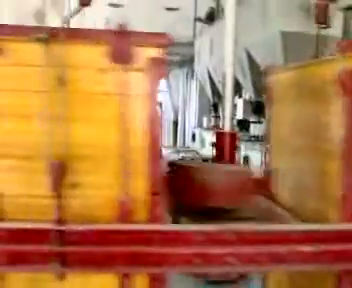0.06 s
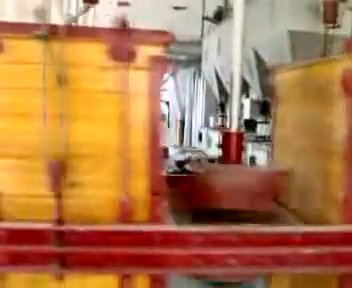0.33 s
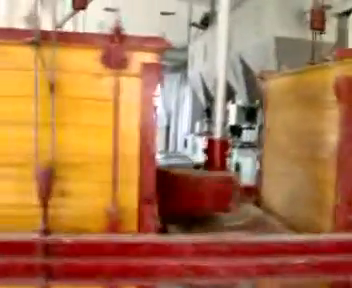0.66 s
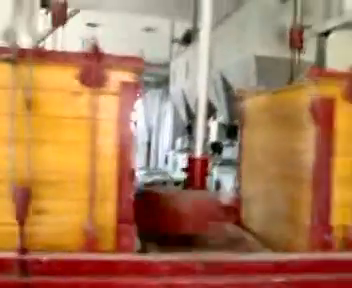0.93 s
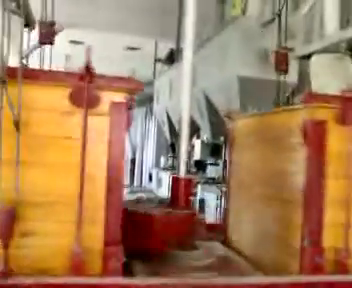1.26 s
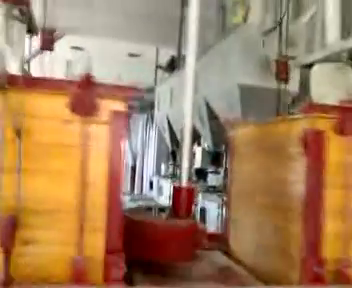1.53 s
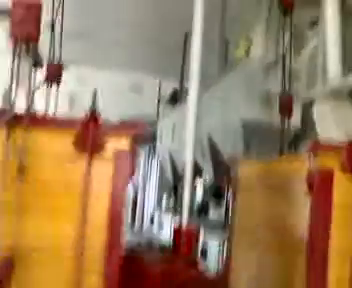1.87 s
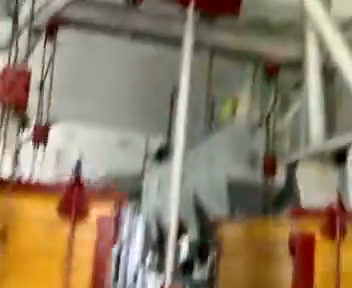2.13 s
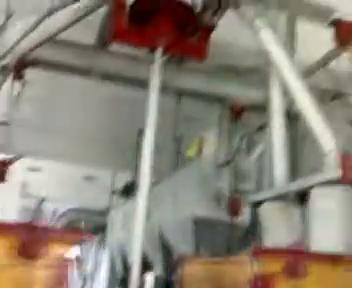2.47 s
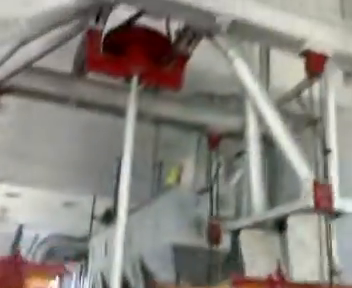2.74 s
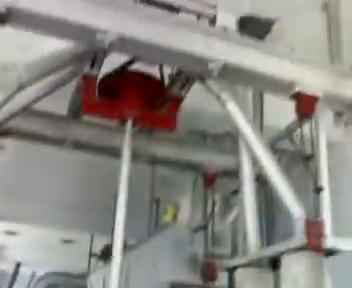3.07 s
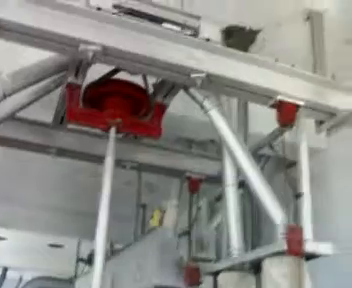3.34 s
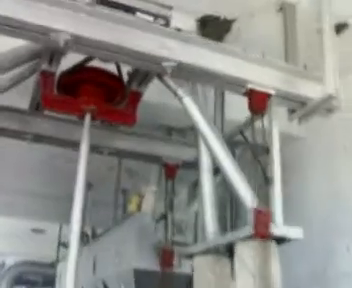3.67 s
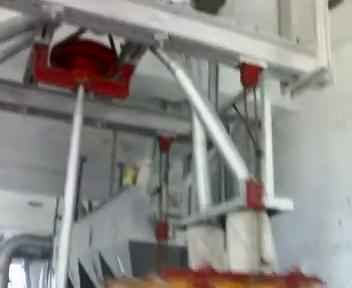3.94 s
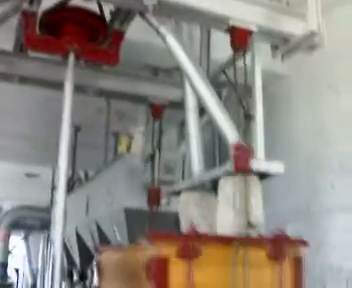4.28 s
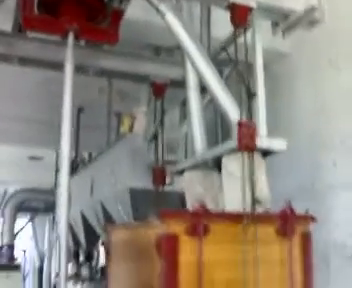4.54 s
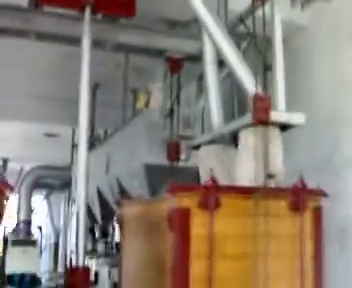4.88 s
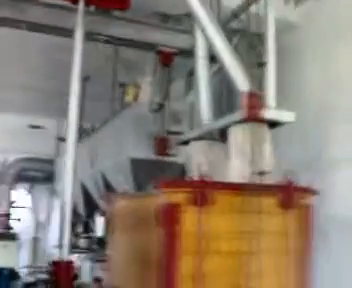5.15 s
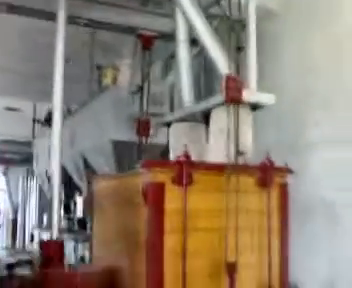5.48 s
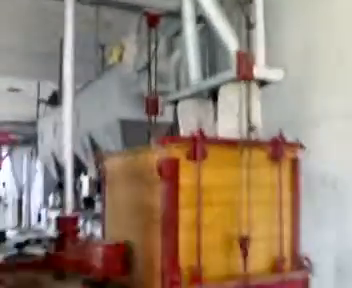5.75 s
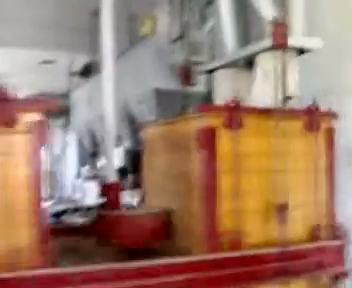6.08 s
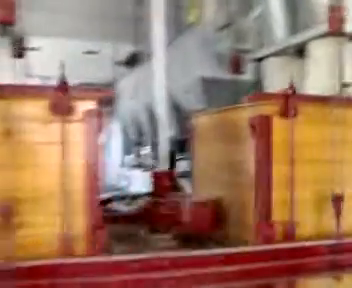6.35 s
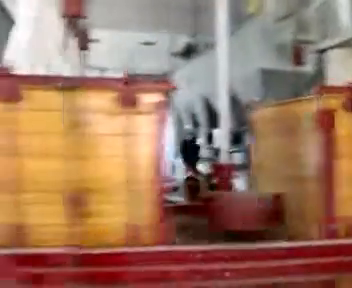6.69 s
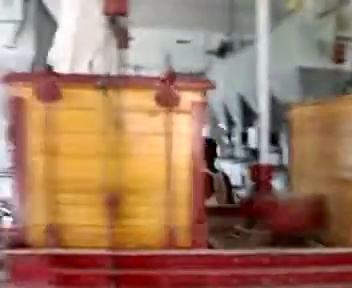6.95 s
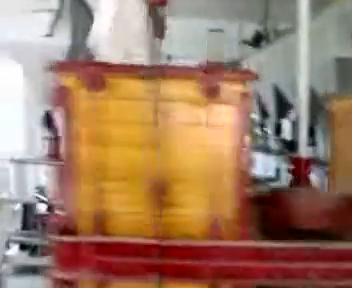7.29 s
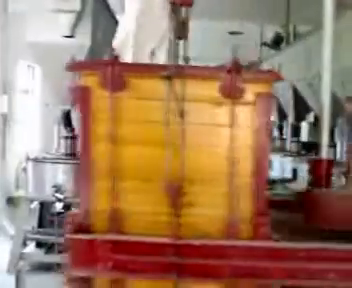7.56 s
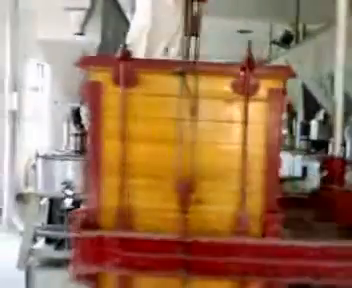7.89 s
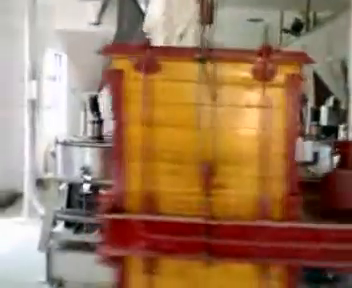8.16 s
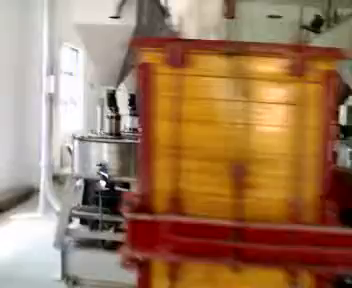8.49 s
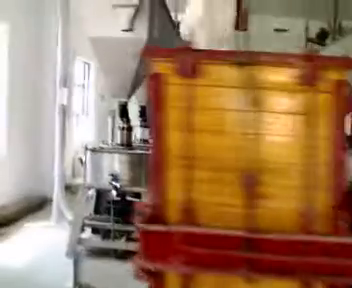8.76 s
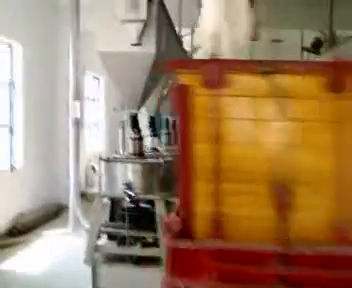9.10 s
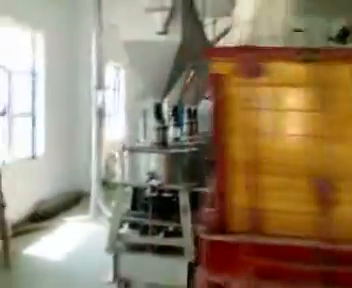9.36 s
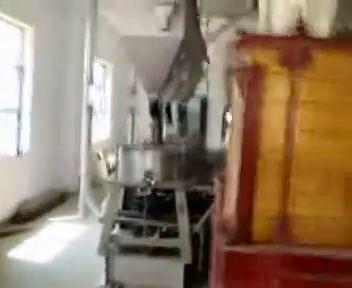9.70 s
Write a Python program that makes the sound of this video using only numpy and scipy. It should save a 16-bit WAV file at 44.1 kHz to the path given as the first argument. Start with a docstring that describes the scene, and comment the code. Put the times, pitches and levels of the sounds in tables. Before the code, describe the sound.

In a flour mill hall, motors and a fan drone under the pulsing hum of geared rollers and the dull swish of a sifter. Ducts rush and hiss, and steel spouts ring with flowing grain. The room blends everything into one loud, constant roar. As the microphone drifts nearer the overhead pipes, a faint metallic whine rises and then recedes.

```python
"""Geared roller mills hum, throb and beat in a flour mill hall, heard from beside the sifter.
Motors and a fan drone, meal swishes round the sieves, and stock rushes through ringing steel spouts.
The hall blends it all into a steady roar. The microphone moves slowly through its standing waves,
nearer to the overhead spouts and a thin metallic whine, and away again."""
import sys
import numpy as np
from scipy import signal
from scipy.fft import rfft, irfft, next_fast_len
from scipy.io import wavfile
from scipy.ndimage import uniform_filter1d, map_coordinates

SR = 44100
rng = np.random.default_rng(int(sys.argv[2]) if len(sys.argv) > 2 else 0)


def materialize(psi):
    """Save the field psi as 16-bit PCM at rate SR to the path in sys.argv[1].

    A 1-D psi becomes a single channel; in a 2-D psi each row is a channel.
    """
    bounded = np.clip(np.atleast_2d(psi).T, -1, 1)
    quanta = np.round(bounded * 32767).astype(np.int16)
    wavfile.write(sys.argv[1], SR, quanta)


N = 433934
t = np.arange(N) / SR


def amp(db):
    """Decibels to gain."""
    return 10 ** (np.asarray(db) / 20)


def unit(x):
    """Scale to rms 1."""
    return x / np.sqrt(np.mean(np.abs(x) ** 2) + 1e-20)


def curve(rows):
    """Interpolate (seconds, value) rows to one value per sample."""
    return np.interp(t, *np.transpose(rows))


def wobble(rate_hz):
    """Smooth random curve, rate_hz knots a second."""
    coarse = t[::64]
    knots = rng.standard_normal(int(t[-1] * rate_hz) + 4)
    return np.interp(t, coarse, map_coordinates(knots, [coarse * rate_hz + 1]))


def filtered(x, response):
    """Apply a gain given as a function of Hz."""
    size = next_fast_len(N + 8192)
    return irfft(rfft(x, size) * response(np.fft.rfftfreq(size, 1 / SR)), size)[:N]


def coloured(x, spectrum):
    """Shape x by (Hz, dB) rows, at rms 1."""
    points_hz, db = np.transpose(spectrum)
    return unit(filtered(x, lambda hz: amp(np.interp(np.log(hz + 1), np.log(points_hz), db))))


def hall_noise(patchy_db):
    """Noise whose narrow peaks and dips shift as the microphone crosses standing waves."""
    bins = signal.stft(rng.standard_normal(N), nperseg=4096)[2]
    field = uniform_filter1d(rng.standard_normal(bins.shape), size=2, axis=0)
    field = unit(uniform_filter1d(field, size=14, axis=1))
    return unit(signal.istft(bins * amp(patchy_db * field), nperseg=4096)[1][:N])


def tone(cycles, diffuse, drift_hz):
    """Direct tone plus reflections that drift in strength and phase, at rms 1."""
    phase = 2 * np.pi * (cycles + rng.random())
    in_phase = (1 + diffuse * wobble(drift_hz)) * np.sin(phase)
    quadrature = diffuse * wobble(drift_hz) * np.cos(phase)
    return unit(in_phase + quadrature)


# Rumble spectrum. Each row: frequency in Hz, relative density in dB.
RUMBLE_SPECTRUM = [(20, -20.5), (50, -19), (78, -14.5), (112, -5.5), (150, -0.9), (250, 0.5), (370, 1),
                   (490, -2.5), (620, -2), (800, -9), (1500, -60.5)]
# Rumble envelope. Each row: time in seconds, level in dB.
RUMBLE_DB = [(0, -22.5), (1.35, -22.5), (1.85, -22), (2.7, -23), (3.2, -22.5), (5.5, -22.5), (7.2, -23.5),
             (8.1, -23.5), (8.5, -23.5), (9.84, -23.5)]


def hall_rumble():
    """The hall blends the machines into a low, nearly steady roar."""
    return amp(curve(RUMBLE_DB)) * coloured(hall_noise(patchy_db=1.0), RUMBLE_SPECTRUM)


# Duct rush and air hiss spectra. Each row: frequency in Hz, relative density in dB.
DUCT_SPECTRUM = [(600, -36), (860, -8), (985, 1.5), (1190, -0.5), (1380, -3.5), (1900, -7.5), (3000, -24.5),
                 (5000, -52.5)]
AIR_SPECTRUM = [(800, -3.5), (2900, 5), (3600, 0.5), (4150, 1), (4900, 2), (5900, -0.5), (7000, -5.5),
                (7380, -10.5), (7600, -38.5)]
# Nearness to the overhead spouts. Each row: time in seconds, gain in dB.
NEARNESS_DB = [(0, -0.8), (0.28, -0.5), (0.45, -2), (1.2, -1), (1.9, 0), (2.3, 1.6), (2.6, -1.5),
               (3.0, 1.5), (3.4, 4), (3.85, 1.5), (4.2, 2.5), (4.45, 0.5), (4.9, 1.5), (5.3, 1), (6.0, 1.2),
               (6.6, 0.5), (7.1, -0.5), (7.5, -1.5), (8.0, -2.5), (8.7, -3.5), (9.1, -2), (9.35, -0.3),
               (9.84, -4)]
# Rushing layers by name. Each row: base level in dB, share of nearness followed, surge depth in dB.
FLOW_LAYERS = {"ducts": (-22, .8, 0.23), "air": (-32, .35, .1)}


def conveying_flow():
    """Ducts rush and conveying air hisses, louder near the spouts and surging with the feed."""
    rush = np.zeros(N)
    for name, spectrum in (("ducts", DUCT_SPECTRUM), ("air", AIR_SPECTRUM)):
        base_db, share, surge_db = FLOW_LAYERS[name]
        level_db = base_db + share * curve(NEARNESS_DB) + surge_db * wobble(rate_hz=3.0)
        rush += amp(level_db) * coloured(hall_noise(patchy_db=1.0), spectrum)
    return rush


# Whine partials. Each row: frequency in Hz, relative level in dB.
WHINE_PARTIALS = [(1752, -2), (1765, -1.5), (1811, -6.5), (2712, -12.5)]
# Whine envelope. Each row: time in seconds, gain in dB.
WHINE_GAIN_DB = [(0, -40.5), (1.9, -43.5), (2.15, -27), (2.7, -28), (3.2, -29), (4.1, -25.5), (4.5, -38),
                 (6.3, -39), (6.9, -34.5), (7.4, -42), (9.84, -43.5)]


def whine():
    """A metallic whine, probably the overhead drive, stands out when the microphone points at it."""
    partials = sum(amp(db) * tone(hz * t, diffuse=0.76, drift_hz=7) for hz, db in WHINE_PARTIALS)
    return amp(curve(WHINE_GAIN_DB)) * partials


# Motor and fan tones. Each row: frequency in Hz, level in dB.
MOTOR_TONES = [(46.05, -51), (91.2, -45), (182.4, -38.5), (185, -41.5), (192.7, -39.5), (199.7, -48.5),
               (212.6, -45.5), (273.7, -44), (333.2, -43.5), (691, -44), (733, -47.5), (812, -44),
               (881, -43), (988, -38), (1073, -41)]
# Main fan tone in the standing waves. Each row: time in seconds, level in dB.
FAN_DB = [(0, -32), (2.5, -29), (3.2, -32.5), (4.1, -31.5), (4.5, -34.5), (5.15, -36.5), (5.45, -30.5),
          (6.3, -29.5), (8.2, -29), (8.6, -33), (9.84, -31.5)]


def motors_and_fan(fan_hz=197.4):
    """Motors and the suction fan hold speed and beat together; higher motor tones waver faster."""
    fan = amp(curve(FAN_DB)) * tone(fan_hz * t, diffuse=0.36, drift_hz=13)
    return fan + sum(amp(db) * tone(hz * t, diffuse=0.22 * hz / 200, drift_hz=0.8 + hz / 180)
                     for hz, db in MOTOR_TONES)


# Spout modes: the lower and the upper modes of the wide spouts, then the narrow spouts. Each row: frequency in
# Hz, width in Hz, relative level in dB.
WIDE_LOW_MODES = [(1590, 52, 1), (1632, 40, -6), (1645, 46, 0), (1700, 36, -3)]
WIDE_HIGH_MODES = [(1743, 50, -1), (1804, 41, -5), (1802, 42, -3.5), (1895, 80, -11), (1972, 82, -6),
                   (2180, 460, -12)]
NARROW_MODES = [(2480, 36, -5.5), (2560, 30, -3), (2580, 26, 0.5), (2634, 40, -2.5), (2682, 30, 3),
                (2750, 16, -0.5), (2760, 24, -3.5), (2730, 420, -8.5), (3590, 500, -9.5)]
# Ringing envelopes for the wide spouts' lower and upper modes and for the narrow spouts. Each row: time in
# seconds, level in dB.
WIDE_LOW_DB = [(0, -24), (.22, -21), (.4, -25), (1.25, -25), (1.6, -24), (2.25, -24), (2.55, -24.5),
               (3.2, -22.5), (3.8, -20.5), (4.25, -21), (4.48, -25.5), (4.7, -24), (4.94, -26.5), (5.08, -21),
               (5.35, -22), (5.6, -25.5), (5.8, -21.5), (6.1, -22.5), (6.5, -19.5), (6.62, -23.5), (6.85, -22),
               (7.35, -31), (7.78, -23), (7.92, -26), (8.6, -28), (9.2, -28), (9.38, -23), (9.84, -25)]
WIDE_HIGH_DB = [(0, -26), (.8, -24), (1.25, -27.5), (1.7, -23), (2.3, -25), (2.7, -24.5), (3.2, -20.5),
                (4.0, -21.5), (4.5, -23), (4.95, -24), (5.1, -22.5), (5.5, -24.5), (5.75, -22.5), (6.1, -24.5),
                (6.9, -23.5), (7.4, -26), (7.75, -25.5), (8.4, -26.5), (9.1, -27), (9.45, -23), (9.84, -27.5)]
NARROW_DB = [(0, -31), (.65, -31), (1.25, -33.5), (1.65, -29.5), (2.9, -29.5), (3.25, -25), (3.5, -27.5),
             (3.65, -27), (4.7, -30), (5.1, -28.5), (6.1, -30), (6.43, -28.5), (7.0, -31), (7.42, -33.5),
             (7.6, -31), (8.9, -33.7), (9.42, -32.5), (9.84, -32.5)]


def spouts(modes, envelope_db, low_hz, high_hz, kernels_per_s=5000):
    """Kernels strike the steel spouts and ring their modes, blurred by the hall."""
    def steel(hz):
        power = sum(np.abs(amp(db) * hz * width / (centre ** 2 - hz ** 2 + 1j * hz * width)) ** 2
                    for centre, width, db in modes)
        radiation_loss = (1 + (hz / high_hz) ** 8) * (1 + (low_hz / (hz + 1)) ** 8)
        return np.sqrt(power / radiation_loss)

    kernels = (rng.random(N) < kernels_per_s / SR) * rng.standard_normal(N)
    blows = hall_noise(patchy_db=2.0) + amp(-7.5) * unit(kernels)
    flicker_db = 0.27 * wobble(rate_hz=11)
    return amp(curve(envelope_db) + flicker_db) * unit(filtered(blows, steel))


# Sieve swish and box resonance spectra. Each row: frequency in Hz, relative density in dB.
SIEVE_SPECTRUM = [(400, -33.5), (660, -6.5), (700, 1), (770, 0), (830, 0), (900, -2.5), (1000, -6.5),
                  (1300, -22), (3000, -56)]
BOX_SPECTRUM = [(720, -29.5), (795, -6.5), (830, 4), (868, -0.5), (920, -6), (1040, -38)]
# Swish swell. Each row: time in seconds, offset in dB.
SWISH_SWELL_DB = [(0, -0.8), (.15, 2.5), (0.4, -1.5), (1.0, 0), (1.85, 1.5), (2.15, 0.1), (2.4, 1.5),
                  (2.6, -2), (3.0, 0.5), (3.28, 1.3), (3.9, 0), (4.5, -0.5), (4.65, 0), (5.0, 2),
                  (5.33, -1), (5.7, 1), (6.1, 1.5), (6.35, -2.2), (6.93, 1), (7.15, -0.5), (7.5, -1),
                  (7.8, -0.5), (8.05, -1), (8.6, -1.5), (9.08, -1.5), (9.27, 0.5), (9.84, -2.5)]
# Box resonance, strongest beside the second box. Each row: time in seconds, level in dB.
BOX_DB = [(0, -36.5), (1.4, -31.5), (2.5, -36), (5.4, -40.5), (5.7, -32.5), (6.4, -38.5), (6.9, -26),
          (7.2, -33), (7.8, -27.5), (8.1, -34.5), (9.05, -33.5), (9.3, -32.5), (9.84, -31.5)]


def sifter(base_db=-22.5):
    """Meal slides round the stacked sieves, dulled by their wooden boxes, which ring with it."""
    meal = amp(base_db + curve(SWISH_SWELL_DB)) * coloured(hall_noise(patchy_db=0.0), SIEVE_SPECTRUM)
    boxes = amp(curve(BOX_DB)) * coloured(hall_noise(patchy_db=1.5), BOX_SPECTRUM)
    return meal + boxes


# Gear hum and its overtones swelling and fading, the lowest beating against a motor tone.
# Each row: time in seconds, level in dB.
MESH_DB = [(0, -39), (.17, -34), (.33, -27), (.92, -26.5), (1.2, -31.5), (1.4, -34), (1.72, -38),
           (1.97, -28.5), (2.55, -28.5), (2.8, -34), (3.02, -36), (3.29, -27.5), (3.6, -38), (4.02, -28.5),
           (4.36, -39), (4.72, -31.5), (5.25, -29.5), (5.56, -41), (5.86, -30.5), (6.45, -29), (6.77, -41),
           (7.1, -33.5), (8.06, -28.5), (9.12, -31.5), (9.38, -47), (9.8, -29)]
OCTAVE_DB = [(0, -37), (.18, -23), (.55, -35.5), (1.0, -24.5), (1.35, -32.5), (1.8, -26.5), (1.95, -36.5),
             (2.6, -29), (2.8, -35), (3.05, -27.5), (3.3, -22), (3.41, -28.5), (3.5, -18), (3.7, -33.5),
             (3.9, -21), (4.07, -28.5), (4.28, -26), (4.55, -37.5), (5.18, -45), (5.35, -27.5), (5.75, -30),
             (5.92, -37), (6.28, -25.5), (6.6, -30), (7.55, -33.5), (8.4, -39), (8.75, -30), (9.35, -42),
             (9.5, -23.5), (9.63, -31), (9.76, -25.5), (9.84, -29)]
THIRD_DB = [(0, -35.5), (.6, -29), (.85, -39.5), (6.2, -38.5), (6.75, -27.5), (7.6, -32.5), (8.6, -48),
            (9.5, -45), (9.8, -31)]
FOURTH_DB = [(0, -34.5), (.38, -29), (.7, -38.5), (1.5, -42), (2.4, -32), (2.9, -34), (3.2, -40.5),
             (4.55, -40.5), (4.85, -31.5), (5.25, -29), (5.6, -35.5), (7.55, -38), (7.8, -45),
             (9.45, -44.5), (9.84, -33.5)]


def gear_hum(turns, octave_turns, teeth=12):
    """Gears mesh once a tooth; off-centre wheels throb once a turn; tooth play roughens the harmonics."""
    mesh_throb = 1 - 0.12 * np.cos(2 * np.pi * turns)
    octave_throb = 1 - 0.28 * np.cos(2 * np.pi * octave_turns)
    mesh = unit(mesh_throb * tone(teeth * turns, diffuse=0.087, drift_hz=9))
    octave = unit(octave_throb * tone(2 * teeth * octave_turns, diffuse=0.42, drift_hz=22))
    third = tone(3 * teeth * turns, diffuse=0.53, drift_hz=9)
    fourth = tone(4 * teeth * turns, diffuse=1.5, drift_hz=18)
    return (amp(curve(MESH_DB)) * mesh + amp(curve(OCTAVE_DB)) * octave
            + amp(curve(THIRD_DB)) * third + amp(curve(FOURTH_DB)) * fourth)


# Mills. Each row: shaft speed in turns per second, sideband gain in dB.
MILL_SHAFTS = [(7.405, -5.5), (7.452, -1.5), (7.484, -5.5)]
# Weaker gear tones of each mill. Each row: multiple of shaft speed, base level in dB.
SIDEBANDS = [(6, -58.5), (9, -56.5), (11, -46), (13, -41.5), (14, -53), (16, -47), (18, -44), (20, -45.5),
             (21, -39.5), (22, -38), (23, -43.5), (25, -43), (26, -48.5), (33, -41), (35, -38), (37, -40),
             (47, -39.5), (59, -41), (60, -42.5), (72, -42.5)]
# Sideband swell. Each row: time in seconds, gain in dB.
SIDEBAND_SWELL_DB = [(0, 0), (1.4, -1), (2.0, 0), (5.2, -1), (6.0, 2.5), (7.0, 1.1), (8.0, 0.5),
                     (9.84, 1.5)]


def roller_mills(speed_drift=0.00096):
    """Mills at slightly different speeds hum and beat; uneven wheels add tones at shaft multiples."""
    shaft_turns = [np.cumsum(hz * (1 + speed_drift * wobble(rate_hz=0.97))) / SR
                   for hz, _ in MILL_SHAFTS]
    sidebands = np.zeros(N)
    for turns, (_, mill_db) in zip(shaft_turns, MILL_SHAFTS):
        for multiple, db in SIDEBANDS:
            sidebands += amp(db + mill_db) * tone(multiple * turns, diffuse=0.6, drift_hz=1.51)
    return amp(curve(SIDEBAND_SWELL_DB)) * sidebands + gear_hum(shaft_turns[1], shaft_turns[2])


def scene():
    """All machines over the hall rumble and conveying flow, in mono."""
    background = hall_rumble() + conveying_flow()
    ringing = spouts(WIDE_LOW_MODES, WIDE_LOW_DB, low_hz=1430, high_hz=2000)
    ringing += spouts(WIDE_HIGH_MODES, WIDE_HIGH_DB, low_hz=1610, high_hz=2550)
    ringing += spouts(NARROW_MODES, NARROW_DB, low_hz=2100, high_hz=3500)
    machines = roller_mills() + motors_and_fan() + whine() + sifter()
    return (background + ringing + machines)[None]


def record(dry, ceiling=0.72, cutoff_hz=7600):
    """Round off the highest peaks, then remove everything above the cutoff."""
    rounded = dry[0] / (1 + np.abs(dry[0] / ceiling) ** 10) ** (1 / 10)
    return filtered(rounded, lambda hz: hz < cutoff_hz)[None]


dry = scene()
out = record(dry)
materialize(out)
```